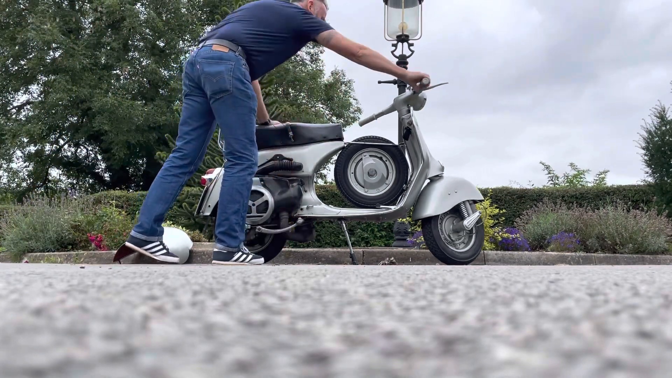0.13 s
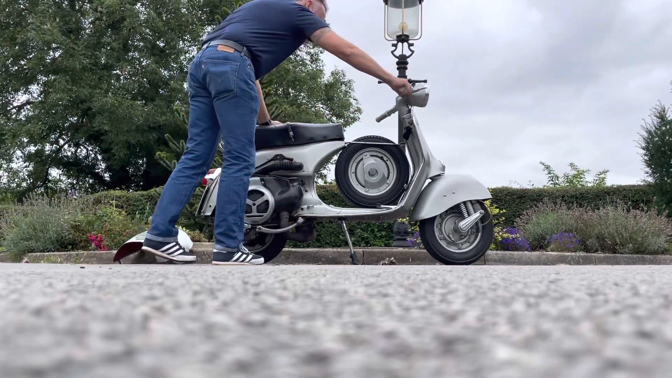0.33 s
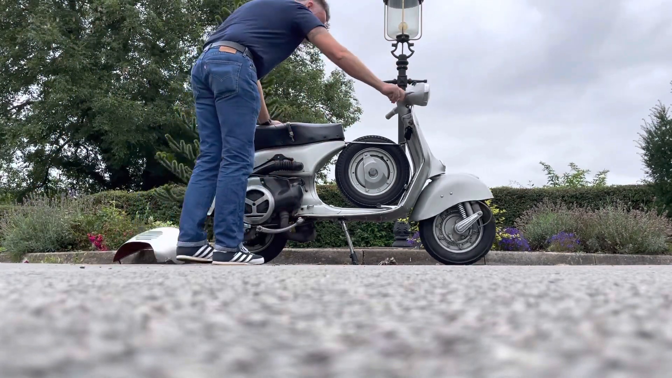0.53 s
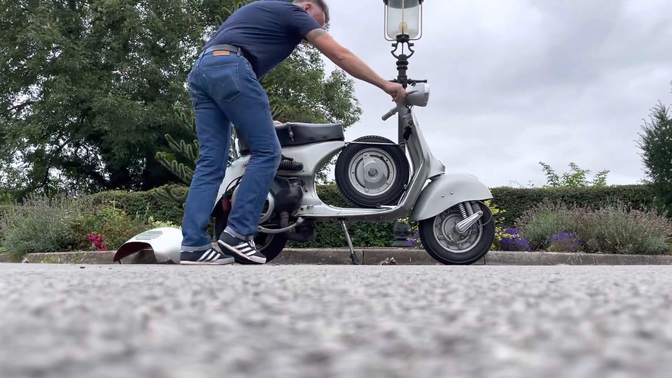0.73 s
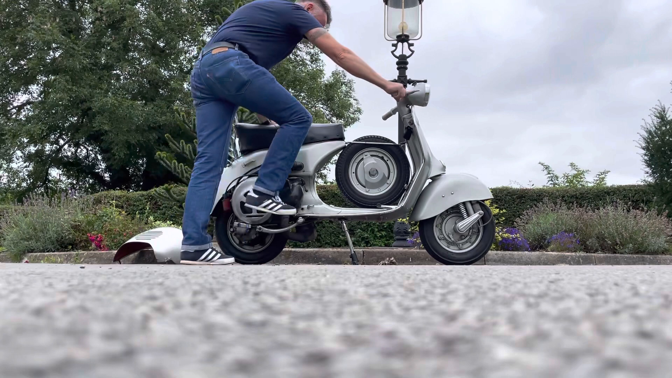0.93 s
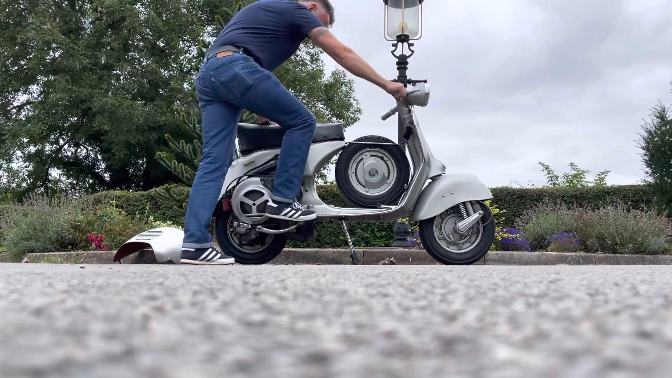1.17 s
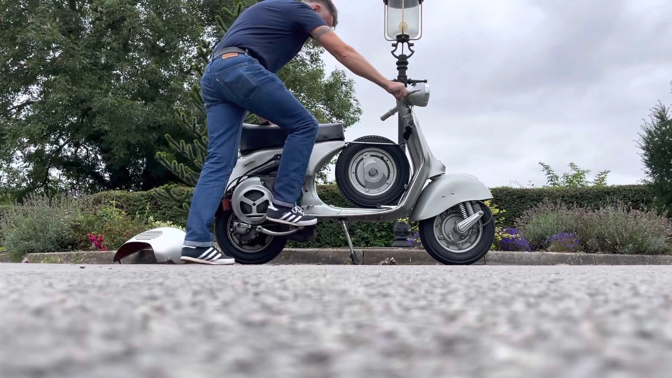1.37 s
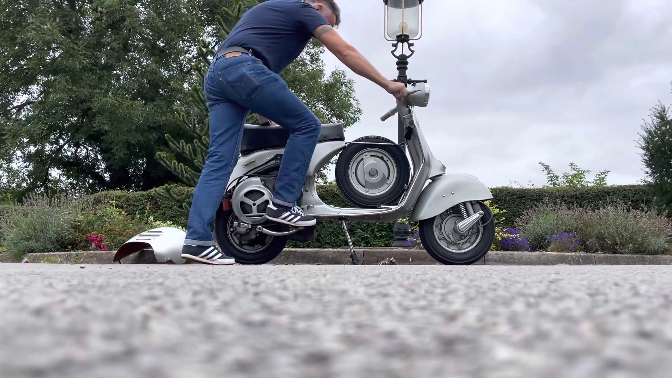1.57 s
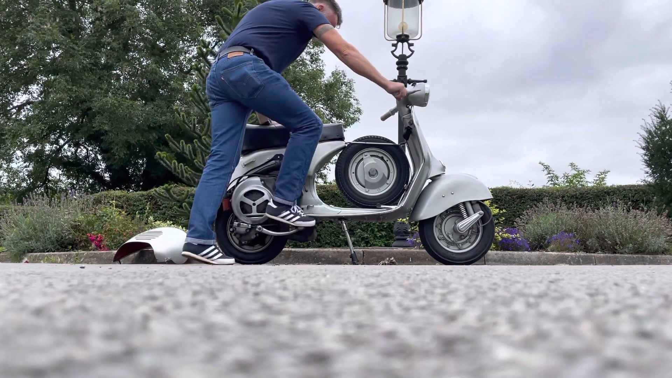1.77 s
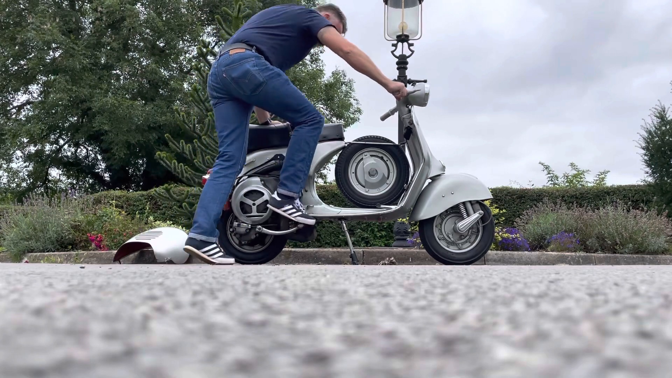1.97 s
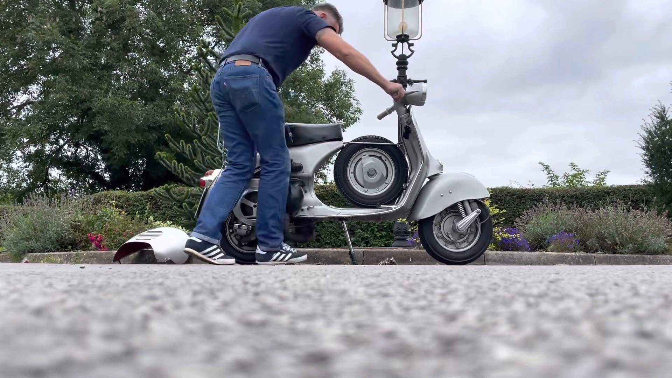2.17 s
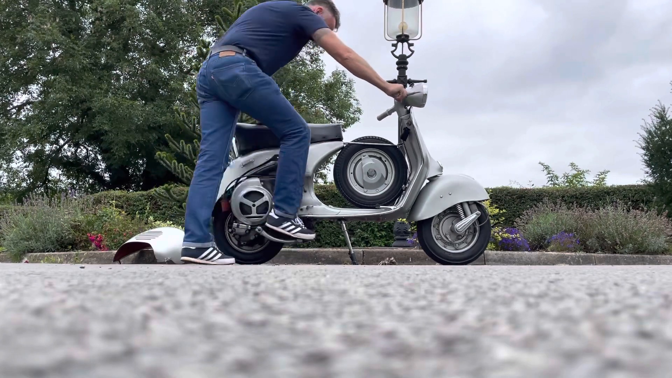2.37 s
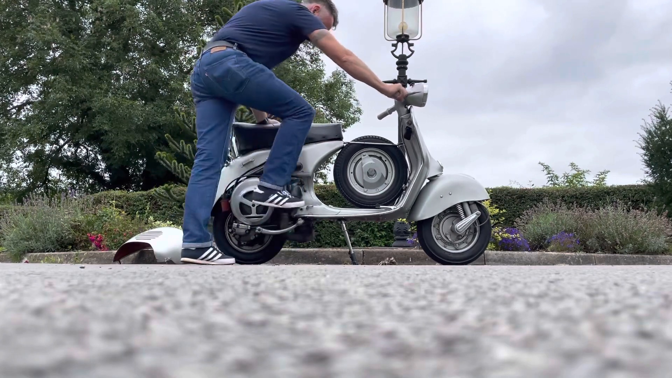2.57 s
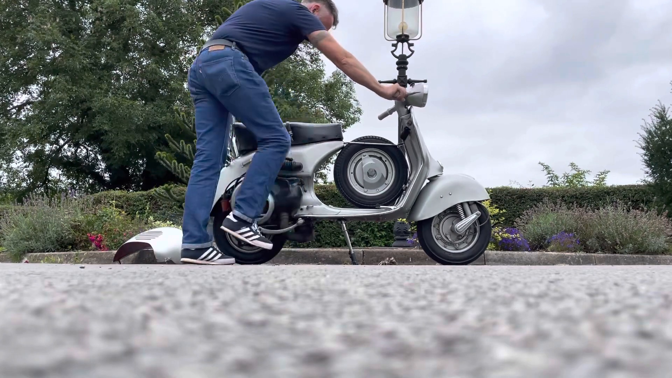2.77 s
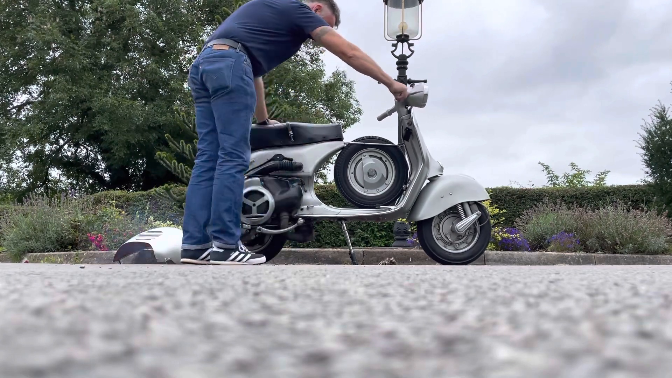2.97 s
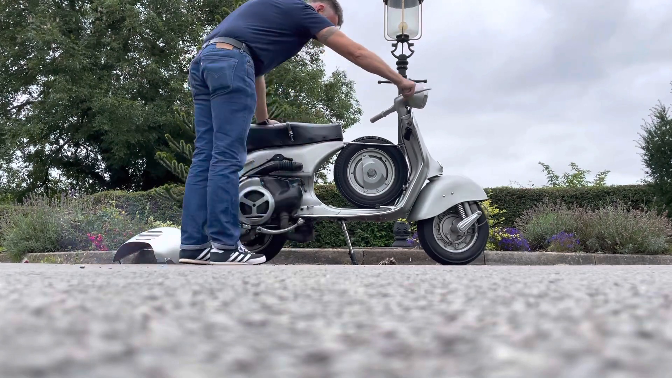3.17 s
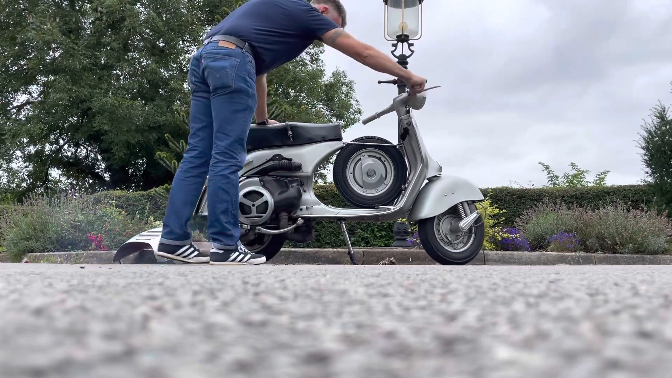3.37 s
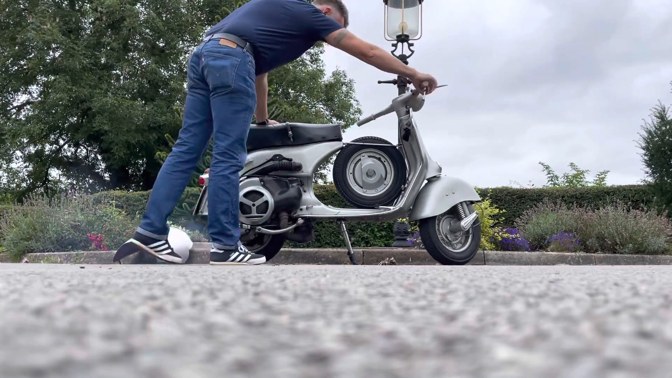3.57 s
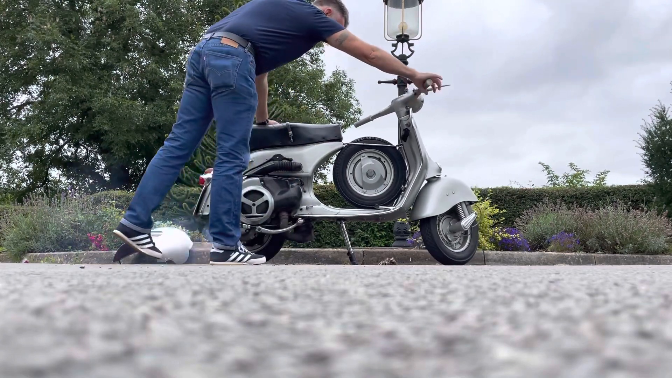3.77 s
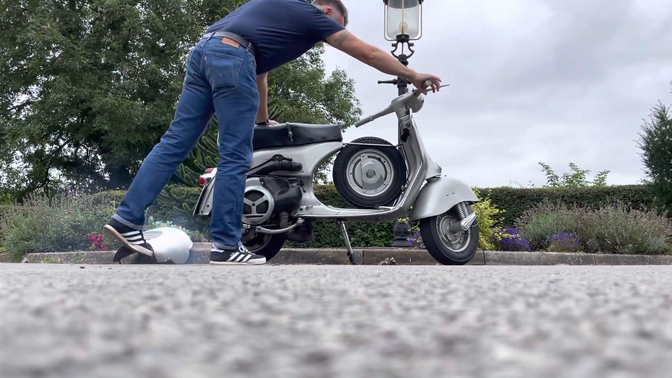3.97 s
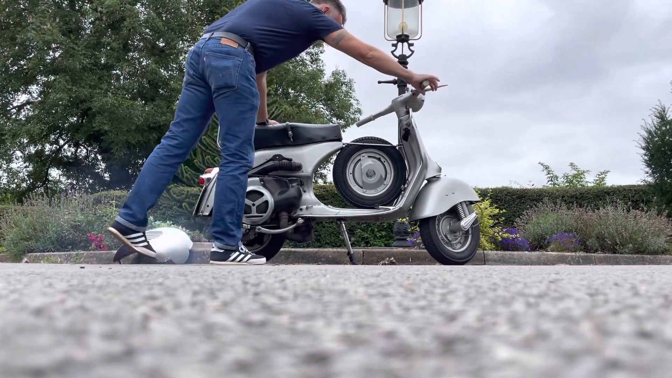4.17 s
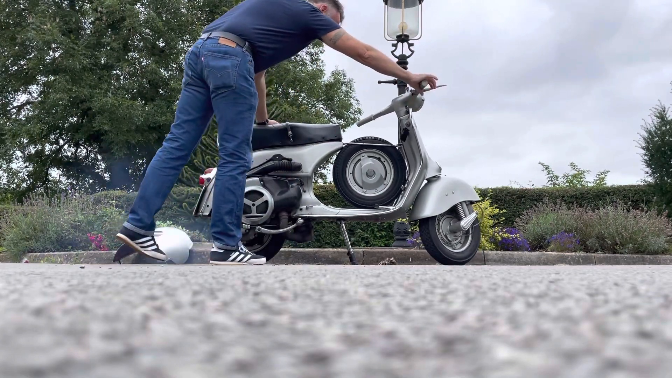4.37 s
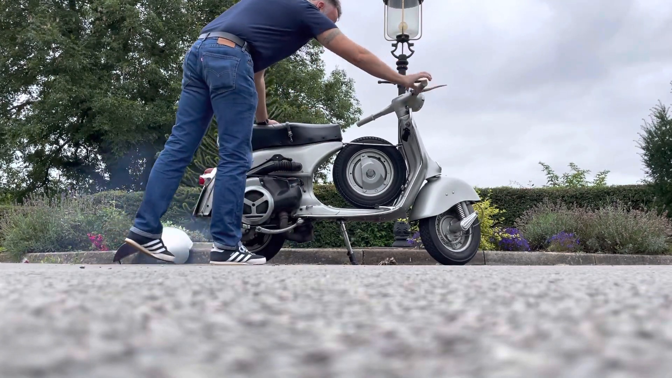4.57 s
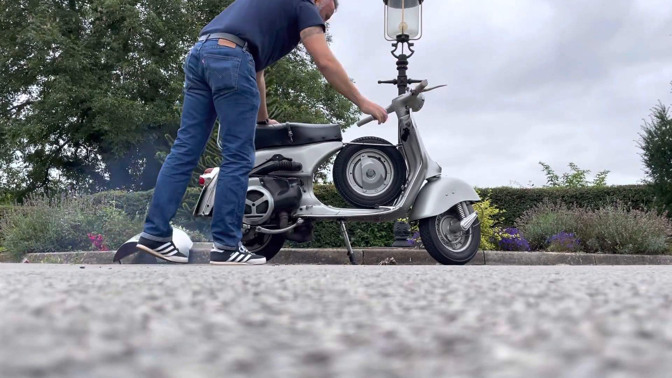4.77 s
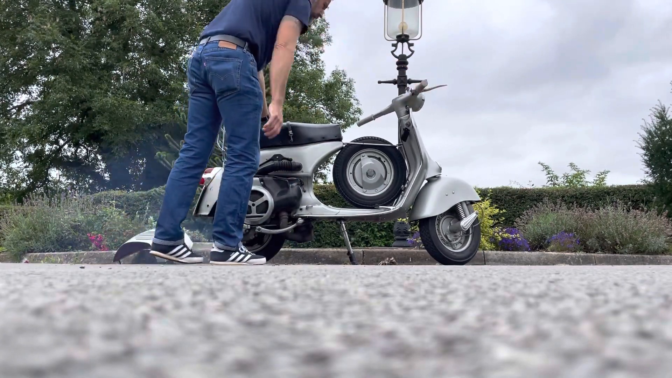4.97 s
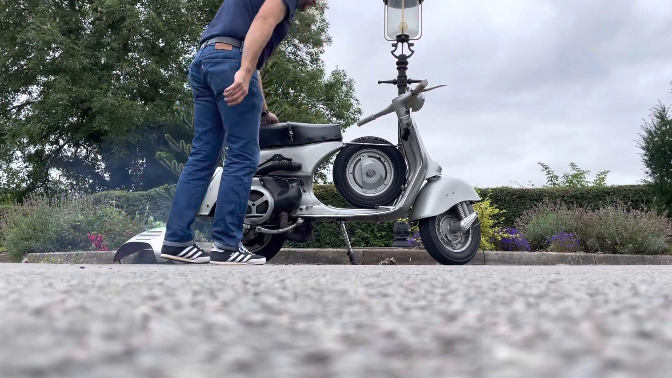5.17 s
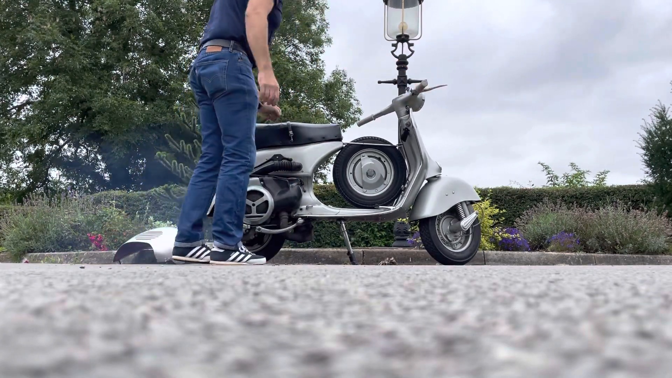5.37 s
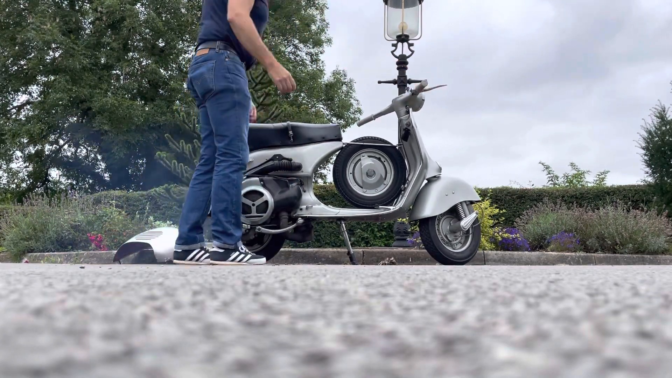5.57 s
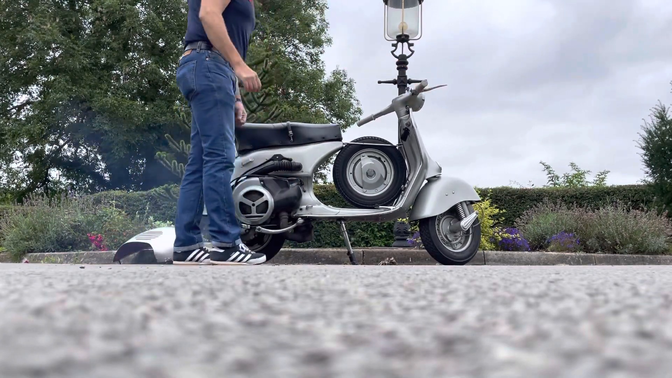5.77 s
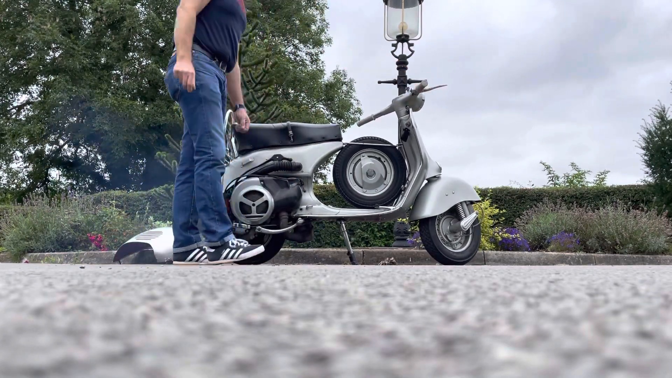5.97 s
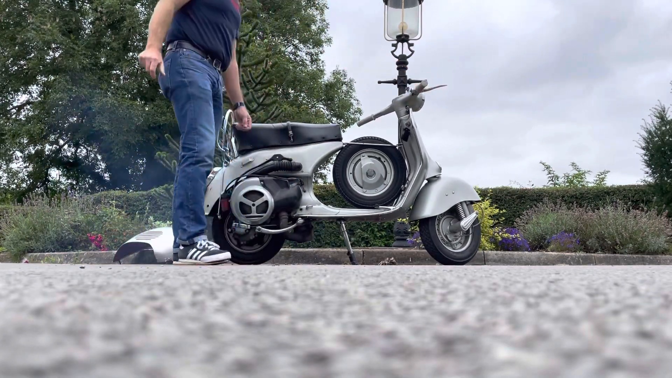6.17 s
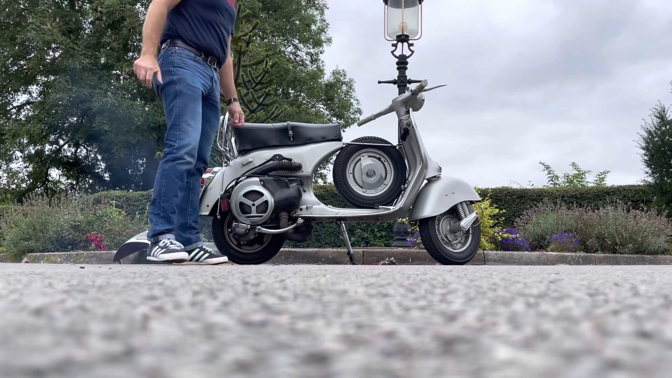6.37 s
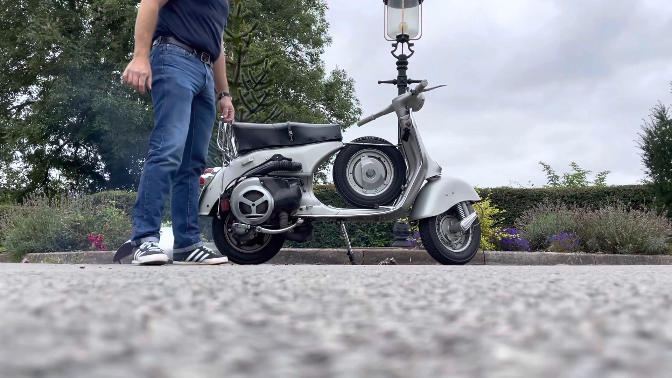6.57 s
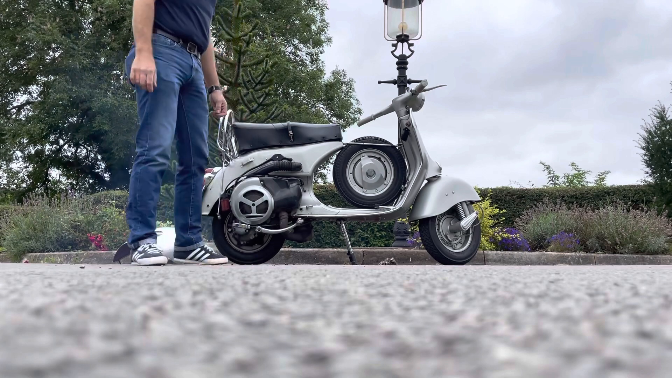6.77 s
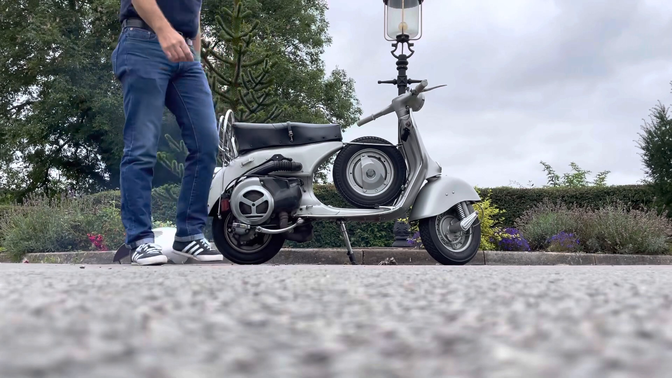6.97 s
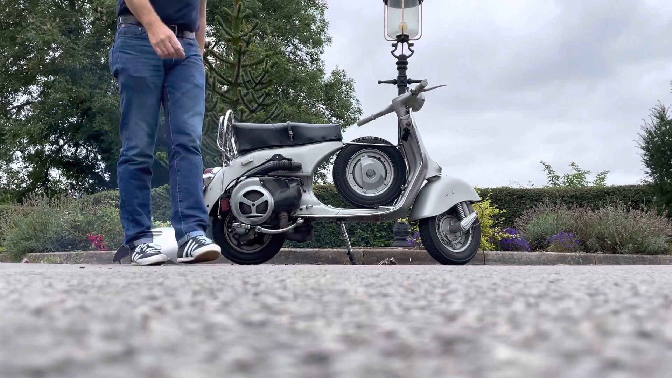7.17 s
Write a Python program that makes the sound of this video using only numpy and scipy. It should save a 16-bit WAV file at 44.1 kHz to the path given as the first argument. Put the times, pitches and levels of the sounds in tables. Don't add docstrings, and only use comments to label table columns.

```python
import sys
import numpy as np
from scipy import signal
from scipy.fft import rfft, irfft
from scipy.io import wavfile
from scipy.ndimage import uniform_filter1d

SR = 44100
rng = np.random.default_rng(int(sys.argv[2]) if len(sys.argv) > 2 else 0)


def materialize(psi):
    bounded = np.clip(np.atleast_2d(psi).T, -1, 1)
    quanta = np.round(bounded * 32767).astype(np.int16)
    wavfile.write(sys.argv[1], SR, quanta)


def field_ratio(decibels):
    return 10 ** (np.asarray(decibels, dtype=float) / 20)


N = 317961
T = np.arange(N) / SR
HZ = np.fft.rfftfreq(N, 1 / SR) + 1

# (time [s], hiss peak [dB], casing ring
# [dB], exhaust thump [dB])
FIRINGS = [(2.1418, -49, -34, -15), (2.1899, -13.5, -19.5, -9), (2.4737, -14.5, -32, -24),
           (2.598, -12.5, -20, -6), (2.6779, -14, -33, -2.5), (3.0517, -6, -10, -11.5),
           (3.2199, -8.5, -11, -11), (3.4682, -18, -21.5, -19), (3.5833, -11, -15.5, -36),
           (3.7369, -22, -23, -34), (3.76, -18.5, -17, -23), (3.9748, -7, -10.5, -11),
           (4.2333, -11.5, -12, -8.5), (4.5183, -14.5, -20, -10), (4.7631, -11, -13.5, -7),
           (4.9912, -10, -18.5, -11.5), (5.2041, -15.5, -37, -35), (5.2943, -12.5, -26, -8.5),
           (5.52, -17.5, -28, -15), (5.7157, -14.5, -20.5, -7.5), (5.9939, -13.5, -27, -9),
           (6.2808, -11, -18.5, -7.5), (6.5114, -11.5, -32, -13), (6.7166, -12, -24, -11.5),
           (6.9362, -12.5, -26, -18), (7.1459, -8, -22, -9)]


def unit(x):
    return x / np.sqrt(np.mean(x ** 2) + 1e-20)


def over_hz(points):
    hz, value = np.transpose(points)
    return np.interp(np.log(HZ), np.log(hz), value)


def colour(x, spectrum):
    return unit(irfft(rfft(x) * field_ratio(over_hz(spectrum)), N))


def ring(x, modes):
    out = 0
    for k, (hz, width_hz, db) in enumerate(modes):
        b, a = signal.iirpeak(hz, hz / max(width_hz, 5), SR)
        out = out + (-1) ** k * field_ratio(db) * signal.lfilter(b, a, x)
    return out


def white():
    return rng.standard_normal(N)


def gritty(spread_db):
    return white() * field_ratio(spread_db * rng.exponential(size=N))


def track(table):
    s, *columns = np.transpose(table)
    gate = np.clip(np.minimum(T - s[0] + .004, s[-1] + 0.0014 - T) / 0.0028, 0, 1)
    return [np.interp(T, s, c) for c in columns] + [gate]


def bursts(times_s, db, rise_s, fall_s):
    marks = np.zeros(N)
    places = np.clip((np.asarray(times_s) * SR).astype(int), 0, N - 1)
    np.add.at(marks, places, field_ratio(np.asarray(db)))
    u = T[:SR // 4]
    shape = (1 - np.exp(-u / rise_s)) * np.exp(-u / fall_s)
    return signal.fftconvolve(marks, shape / shape.max())[:N]


def hold(start_s, length_s, attack_s, release_s):
    rise = np.clip((T - start_s) / attack_s + 1, 0, 1) ** 2
    return rise * np.exp(-np.clip(T - start_s - length_s, 0, None) / release_s)


def window(turn, centre, sharp, scatter_db):
    shifted = turn - centre + .5
    size = field_ratio(scatter_db * rng.standard_normal(400))[shifted.astype(int) % 400]
    return size * np.exp(sharp * (np.cos(2 * np.pi * (turn - centre)) - 1))


def opening(turn, start, length, scatter_db):
    size = field_ratio(scatter_db * rng.standard_normal(400))[(turn - start + 1).astype(int) % 400]
    return uniform_filter1d(size * np.exp(-(((turn - start) % 1) / length) ** 3), SR // 300)


def hum():
    # (frequency [Hz], density [dB per Hz])
    hum_spectrum = [(12, -48), (20, -1), (108, 4), (167, -5), (500, -19.5), (1100, -20), (1900, -39),
                    (9000, -62)]
    drift = uniform_filter1d(uniform_filter1d(white(), SR // 12), SR // 12)
    gust = field_ratio(1.5 * unit(drift))
    mid = colour(white() * gust, hum_spectrum)
    side = colour(white(), hum_spectrum)
    return field_ratio(-57) * (mid + 0.34 * side * np.array([[1], [-1]]))


def birds():
    # (start [s], length [s], first pitch [Hz], last pitch [Hz], level [dB])
    trill = [
        (0, .185, 7940, 7530, -57),
        (.2, 0.084, 7900, 8040, -70),
        (.26, 0.079, 7950, 7740, -66),
    ]
    whistles = [(.39, .025, 2630, 2850, -62), (.41, 0.047, 2820, 2580, -61),
                (.448, 0.045, 3150, 2760, -58.5), (.5, .04, 2860, 3050, -69), (.53, 0.056, 2700, 2620, -70),
                (.585, 0.063, 2380, 2350, -74), (.4, 0.046, 3280, 3520, -66),
                (.465, 0.039, 3730, 3560, -65), (.95, 0.049, 3400, 3560, -79), (1.1, 0.07, 3350, 3290, -80),
                (1.425, .03, 3350, 3350, -83)]
    edge_s = 0.0061
    buzz = unit(ring(white(), [(150, 200, 0)]))
    out = 0
    for calls, spread_hz, gain_db in ((trill, 110, 4.0), (whistles, 30, 6.5)):
        for s, length_s, first_hz, last_hz, db in calls:
            hz = np.interp(T, [s, s + length_s], [first_hz, last_hz]) + spread_hz * buzz
            level = field_ratio(db + gain_db) * hold(s + edge_s, length_s - 2 * edge_s, edge_s, edge_s / 2)
            out = out + level * (1 + 0.26 * buzz) * np.sin(2 * np.pi * np.cumsum(hz) / SR)
    return out


def scuffs():
    # (start [s], hold [s], body [dB], grit [dB])
    drags = [(0.054, 0.034, -77, -73), (0.117, 0.22, -60, -77), (0.386, 0.15, -51.5, -73),
             (0.68, 0.037, -58.5, -73), (.76, .05, -69, -74), (0.828, 0.11, -67, -71),
             (1.187, 0.087, -58, -80), (1.337, .05, -66, -78), (1.597, 0.058, -62, -79),
             (1.796, 0.011, -49.5, -92), (1.945, 0.057, -63, -72)]
    # (time [s], level [dB])
    shifts = [(.06, -49), (.22, -49), (.33, -50), (.55, -48), (.78, -52), (.9, -58), (1.16, -51),
              (1.22, -44), (1.39, -50), (1.62, -56), (1.81, -49), (1.94, -56)]
    attack_s, release_s, shift_s = 0.048, 0.052, 0.037
    scrape, crunch, weight = np.zeros(N), np.zeros(N), np.zeros(N)
    for s, length_s, body_db, grit_db in drags:
        drag = hold(s, length_s, attack_s, release_s)
        scrape += field_ratio(body_db) * drag
        crunch += field_ratio(grit_db) * drag
    for s, db in shifts:
        weight += field_ratio(db) * np.exp(-((T - s) / shift_s) ** 2)
    body = unit(ring(gritty(2.0), [(210, 25, 6.5), (452, 280, -2), (910, 580, -13.5)]))
    grit = unit(ring(ring(gritty(2.0), [(3230, 3700, 0), (1300, 830, 5)]), [(3350, 13000, 0)]))
    rumble = unit(ring(ring(gritty(2.0), [(70, 56, 0)]), [(75, 80, 0)]))
    return field_ratio(0.5) * scrape * body + field_ratio(1.5) * crunch * grit + field_ratio(-4.5) * weight * rumble


def knocks():
    # (time [s], peak [dB], ring [Hz], treble [dB], ring share [dB])
    hits = [(0.115, -47.5, 264, -71, 5), (0.144, -56.5, 427, -66, 11), (0.204, -41, 229, -44.5, -17),
            (0.215, -41, 600, -47, -20), (0.248, -49, 272, -73, -15), (0.285, -54, 288, -59, -13),
            (0.353, -41.5, 424, -47.5, -7), (0.57, -51, 210, -64, -10), (0.68, -50, 1166, -70, -7),
            (1.149, -46, 270, -69, -8), (1.182, -38.5, 722, -41.5, -3), (1.205, -37.5, 368, -71, -1.5),
            (1.219, -48.5, 690, -69, 4), (1.27, -56, 431, -57, -2), (1.326, -48, 657, -66, -1),
            (1.581, -26.5, 787, -26.5, -11.5), (1.638, -55, 433, -66, 2), (1.786, -45, 1196, -74, 2),
            (1.93, -54, 915, -74, -6), (1.982, -28, 707, -33, -5.5), (2, -11.5, 984, -14, -30),
            (2.162, -12, 267, -21, -5.5)]
    dull_t60_s, steel_t60_s, steel_above_hz = .13, 0.27, 1050
    out, u = np.zeros(N), T[:SR // 3]
    for s, db, hz, treble_db, ring_db in hits:
        noise = rng.standard_normal(len(u))
        t60_s = steel_t60_s if hz > steel_above_hz else dull_t60_s
        note = np.sin(2 * np.pi * hz * u) + .7 * np.sin(2 * np.pi * 1.14 * hz * u)
        note = note * np.exp(-np.log(1000) * u / t60_s)
        note = note * (1 + .5 * (hz / 1200) * unit(uniform_filter1d(noise, SR // 100)))
        body = unit(ring(noise, [(hz, 450, 0), (1300, 1100, -3)]))
        body = body * (np.exp(-u / 0.011) + 0.11 * np.exp(-u / 0.017))
        crack = unit(ring(noise, [(3620, 5100, 0.92), (5600, 5370, 0.083)]))
        crack = crack * (np.exp(-u / 0.0069) + 0.027 * np.exp(-u / 0.018))
        i = int(s * SR)
        out[i:i + len(u)] += field_ratio(db + ring_db) * note + field_ratio(db - 5.5) * body + field_ratio(treble_db - 2.0) * crack
    return out


def kick_gear():
    # (frequency [Hz], width [Hz], level [dB])
    gear_modes = [(2580, 32, 8), (3000, 190, 5), (4920, 230, 13), (5270, 58, 8), (6170, 160, 14.5),
                  (6640, 51, -15), (10600, 470, 8)]
    graze_start_s, graze_end_s, graze_db = 2.08, 2.125, -47
    spin_start_s, spin_end_s, spin_db, swell_db = 2.196, 2.445, -37, 13
    spin_s = spin_end_s - spin_start_s
    swell = field_ratio(spin_db + swell_db * np.clip((T - spin_start_s) / spin_s, 0, 1))
    spin = swell * hold(spin_start_s, spin_s, .008, 0.0054)
    graze = field_ratio(graze_db) * hold(graze_start_s, graze_end_s - graze_start_s, 0.0073, 0.015)
    fits = field_ratio(3.5 * unit(uniform_filter1d(white(), SR // 90)))
    steel = ring(gritty(2.2), gear_modes + [(4500, 12000, 1.0)])
    return (spin + graze) * fits * field_ratio(4.5) * unit(ring(steel, [(6000, 15000, 0)]))


def every_firing():
    idle_turns = [1, 7, 3, 2, 7, 8, 11, 5, 6, 1, 8, 9, 9, 7, 6, 5, 2, 5, 4, 6, 6, 5, 4, 4, 4]
    race_after, race_turns = 5, 9
    first_turn_s, gain_s, top_turn_s = .0343, .0023, .0208
    k = np.arange(race_turns)
    s = FIRINGS[race_after - 1][0] + np.cumsum(np.maximum(first_turn_s - gain_s * k, top_turn_s))
    hiss_db, ring_db, thump_db = -13.5 + 0 * k, -19.5 + 0.8 * k, -3 - 2.8 * k
    fired = np.insert(np.array(FIRINGS), race_after, np.c_[s, hiss_db, ring_db, thump_db], axis=0)
    return fired, np.insert(idle_turns, race_after - 1, 1 + 0 * k)


def crank():
    sag, drag_per_s = 0.0978, .17
    fired, between = every_firing()
    s = fired[:, 0]
    s = np.r_[s[0] - .2, s, s[-1] + .2]
    turns = np.r_[3, between, 4]
    swing = sag * (20 * np.diff(s) / turns) ** 2 + drag_per_s * turns / 45
    place = np.clip(np.interp(T, s, np.arange(len(s))), 0, len(turns) - 1e-9)
    k, u = place.astype(int), place % 1
    return np.r_[0, np.cumsum(turns)][k] + turns[k] * (u + swing[k] * u * (1 - u))


def slowness(speed):
    return np.clip(21 / speed, 0, 1)


def shaft_hum(turn, speed):
    # (multiple of shaft speed [-], level at 50 turns/s [dB])
    shaft_orders = [(2, -33), (3, -30), (4, -29), (5, -31), (6, -25), (8, -33), (11, -34), (13, -33),
                    (15, -32), (16, -27)]
    lines = sum(field_ratio(db) * np.sin(2 * np.pi * k * turn + k) for k, db in shaft_orders)
    return lines * (speed / 50) ** 1.5 * (1 + .4 * np.cos(2 * np.pi * turn)) * (T > FIRINGS[3][0])


def intake(turn, speed):
    # (frequency [Hz], width [Hz], level [dB])
    inlet_modes = [(524, 260, 0), (665, 102, 3.5), (787, 110, -4)]
    gulp = .6 / slowness(speed) + window(turn, .4, 2.2, 1.5)
    snap = window(turn, .33, 510, 0.47)
    return unit(ring(white() * gulp, inlet_modes)) + 0.2 * unit(ring(snap, inlet_modes))


def clatter(turn, speed):
    # (frequency [Hz], width [Hz], level [dB])
    casing_modes = [(1168, 168, 10), (1351, 104, 11), (1946, 58, 6), (2094, 22, -10), (2615, 28, -1.5),
                    (2890, 48, -6), (3160, 180, -4)]
    # (frequency [Hz], density [dB per Hz])
    broad_spectrum = [(200, 16.5), (500, 10.5), (1000, 14), (3000, -13), (5000, -27), (7000, -33.5),
                      (8300, -33), (10500, -49.5), (13000, -38), (15000, -70), (16500, -70)]
    slow = slowness(speed)
    stroke = .3 / slow + opening(turn, .64, .42, 1.8)
    rub = gritty(1.5) * stroke
    slap = opening(turn, .65, .14, 2.8) * white()
    slap = unit(ring(slap, casing_modes[4:6] + [(4000, 1200, -21)]))
    casing = unit(ring(rub, casing_modes)) + .5 * slow * slap
    broad = colour(rub, broad_spectrum)
    hiss = unit(signal.sosfilt(signal.butter(2, 3800, "high", fs=SR, output="sos"), broad))
    return field_ratio(3.5) * (0.52 * casing + 1.63 * broad) + field_ratio(3) * hiss


def exhaust(turn, speed, start_s):
    # (frequency [Hz], width [Hz], level [dB])
    silencer_modes = [(191.4, 48, -4), (272, 21, 0.5), (338, 70, -9.5), (450, 35, -12)]
    airbox_modes = [(60, 35, -5), (92, 45, 0), (140, 60, -7)]
    catch_s, afterblow_s = 0.14, 0.069
    puffs = window(turn, .72, 67, 1.8) - .7 * window(turn, .13, 51, 2.5)
    puffs = unit(ring(ring(puffs, silencer_modes), [(260, 300, 0)]))
    thud = unit(ring(window(turn, .3, 30, 1.5), airbox_modes))
    roar = unit(ring(ring(white(), silencer_modes), [(265, 270, 0)]))
    fired = every_firing()[0]
    blow = np.clip((T - start_s) / catch_s, 0, 1) ** 1.2
    blow = blow + 0.76 * bursts(fired[:, 0], fired[:, 3] + 12, 0.0082, afterblow_s)
    pumping_db = -32 + 0.5 * np.log2(speed / 25)
    return field_ratio(pumping_db) * blow * (.65 * puffs + .9 * slowness(speed) * thud + .45 * roar)


def engine():
    # (time [s], mechanical level [dB], throttle opening [dB])
    running = [(1.99, -54, -35), (2.03, -48, -31.5), (2.1, -31, -33), (2.15, -33.5, -42),
               (2.19, -27.5, -23), (2.26, -25.5, -22.5), (2.41, -27, -19), (2.53, -32.5, -24.5),
               (2.63, -30, -28.5), (2.69, -24.5, -27), (2.92, -28, -22.5), (3.15, -28.5, -26.5),
               (3.62, -29.5, -28.5), (3.76, -29.5, -25), (4.5, -33, -23), (5.55, -32, -25.5),
               (6.5, -29.5, -24.5), (7.21, -33.5, -25.5)]
    clatter_db, intake_db, on = track(running)
    turn = crank()
    speed = np.gradient(turn) * SR
    return on * (exhaust(turn, speed, running[0][0]) + field_ratio(intake_db - 0.5) * intake(turn, speed)
                 + shaft_hum(turn, speed) + field_ratio(clatter_db) * clatter(turn, speed))


def firings():
    # (frequency [Hz], width [Hz], level [dB])
    fin_modes = [(5430, 2100, 5.5), (5530, 640, 10.5), (6300, 570, 1.5), (6710, 520, 8.5), (8760, 830, 6),
                 (10490, 530, 4), (12900, 1430, 3.5), (15000, 840, -18)]
    leak_s, leak_db = .014, -21
    s, hiss_db, ring_db, thump_db = every_firing()[0].T
    gas, leak, charge = rng.standard_normal((3, N))
    hiss = unit(ring(gas, fin_modes)) * bursts(s - .001, hiss_db - 6, 0.0022, 0.0062)
    hiss += unit(ring(leak, fin_modes)) * bursts(s - leak_s, hiss_db - 11 + leak_db + 11, 0.021, 0.0055)
    knock = unit(ring(charge, [(6845, 200, 0)])) * (np.gradient(crank()) * SR / 50) ** 2
    hiss += knock * bursts(s, hiss_db - 8.5, 0.003, 0.0044)
    strike = leak * bursts(s, ring_db, 0.00039, 0.0068)
    casing = ring(strike, [(1047, 220, 0), (1885, 166, -2.5), (3050, 230, -10)])
    pulse = bursts(s + 0.0067, thump_db, 0.00091, 0.0011)
    thump = ring(pulse, [(71, 6, 0.5), (214, 71, 3.5), (830, 390, 2.5)])
    return hiss + field_ratio(17.5) * casing + field_ratio(5) * thump


def scatter(x, fall_s, low_hz, high_hz):
    u = T[:SR // 3]
    tail = rng.standard_normal((2, len(u))) * np.exp(-u / fall_s) * (u > .004)
    tail = signal.sosfilt(signal.butter(3, [low_hz, high_hz], "band", fs=SR, output="sos"), tail)
    return signal.fftconvolve(x[None], tail / np.sqrt(np.sum(tail ** 2) / 2), axes=1)[:, :N]


def scene():
    dull = signal.butter(5, 12900, fs=SR, output="sos")
    near = signal.sosfilt(dull, engine() + kick_gear()) + firings() + knocks() + scuffs()
    far = birds()
    near_returns = field_ratio(-17) * scatter(near, 0.036, 286, 6150)
    far_returns = field_ratio(-4.5) * scatter(far, 0.079, 2200, 8000)
    return near + near_returns + 0.98 * far + far_returns + hum()


def low_pass(x):
    return signal.sosfilt(signal.butter(12, 16510, fs=SR, output="sos"), x)


def record(dry):
    # (frequency [Hz], phase between ports [rad])
    port_phase = [(20, 0), (1700, .08), (5000, .25), (7200, 1.0), (7750, 3.1416), (8850, 3.1416),
                  (9300, 4.9), (10500, 6.2832), (11600, 6.2832), (12300, 7.8), (12550, 9.4248),
                  (13600, 9.4248), (14000, 11.2), (15000, 12.5)]
    # (frequency [Hz], left minus right [dB])
    port_balance = [(60, 0.5), (110, 1.0), (200, 1.0), (380, 1.0), (700, 2.5), (1290, 2.0), (2380, 2.0),
                    (4400, 0.5), (8120, 0.0), (15000, 0.0)]
    half = field_ratio(over_hz(port_balance) / 2) * np.exp(.5j * over_hz(port_phase))
    band = 1 / np.sqrt(1 + (45 / HZ) ** 8 + (HZ / 13200) ** 10 + (HZ / 15400) ** 70)
    ports = irfft(rfft(dry, axis=1) * np.array([half, 1 / half]) * band, N, axis=1)
    return low_pass(np.tanh(0.52 * ports) / 0.69)


dry = scene()
out = record(dry)
materialize(out)
```